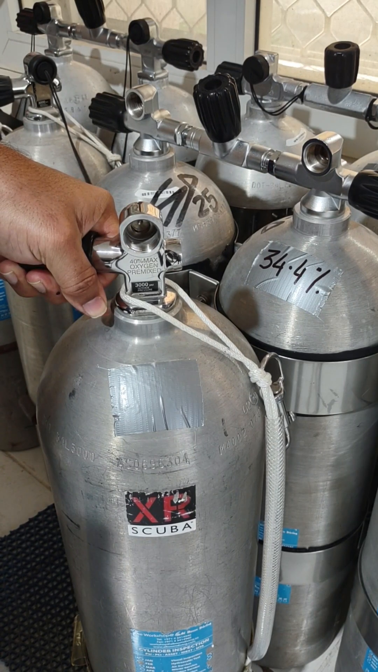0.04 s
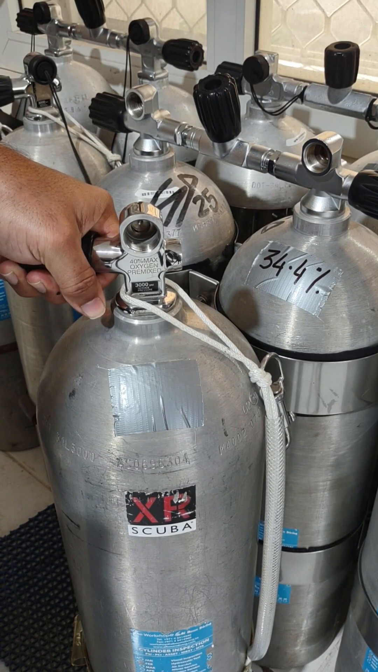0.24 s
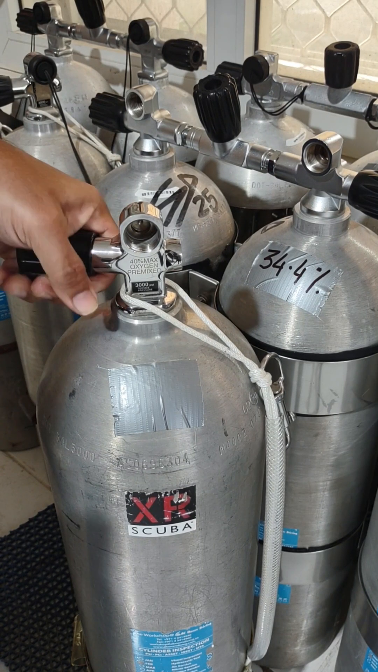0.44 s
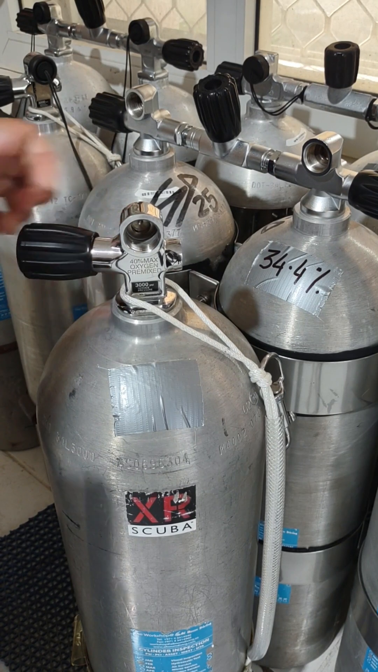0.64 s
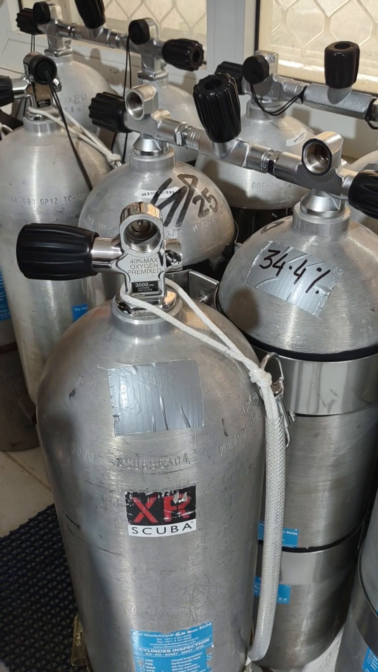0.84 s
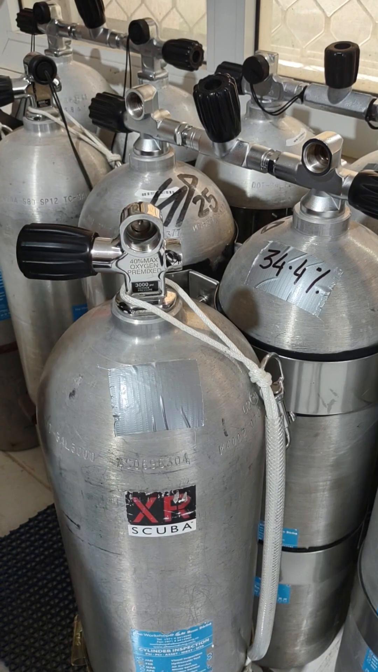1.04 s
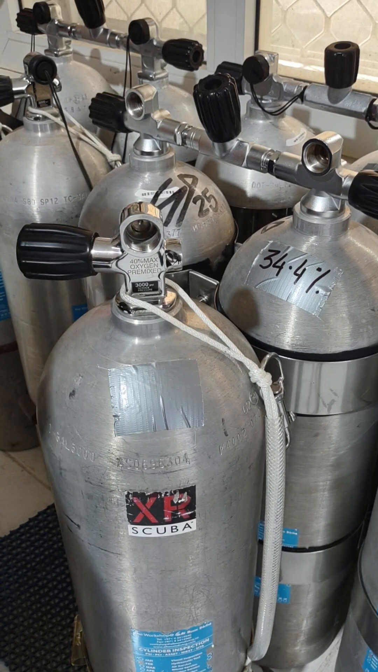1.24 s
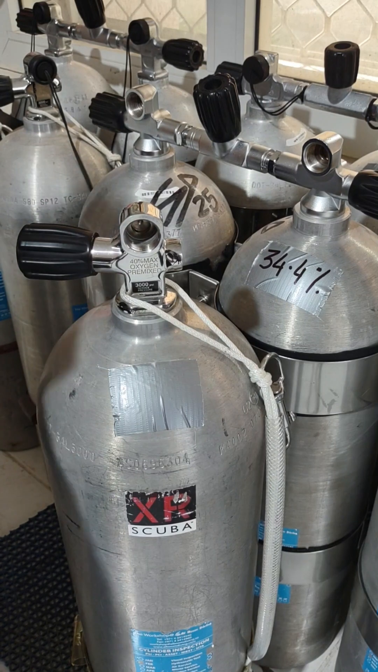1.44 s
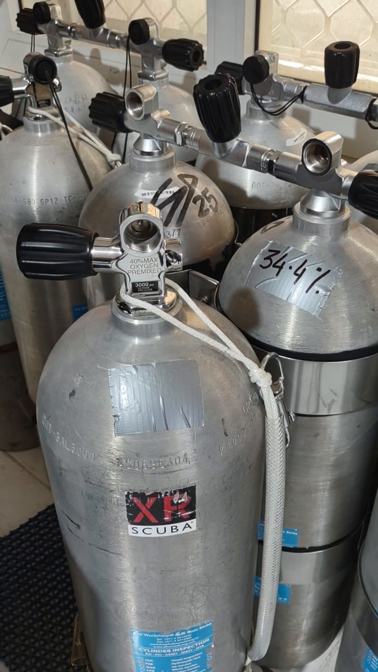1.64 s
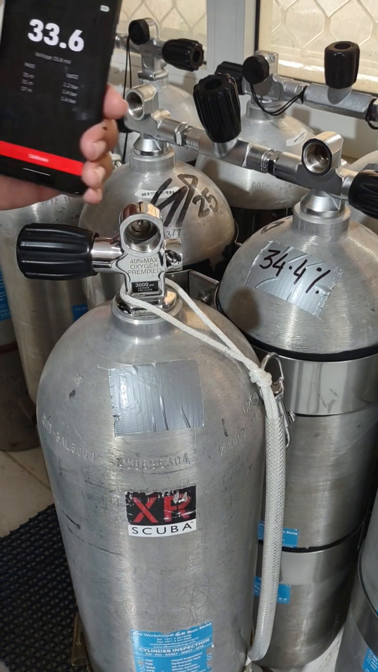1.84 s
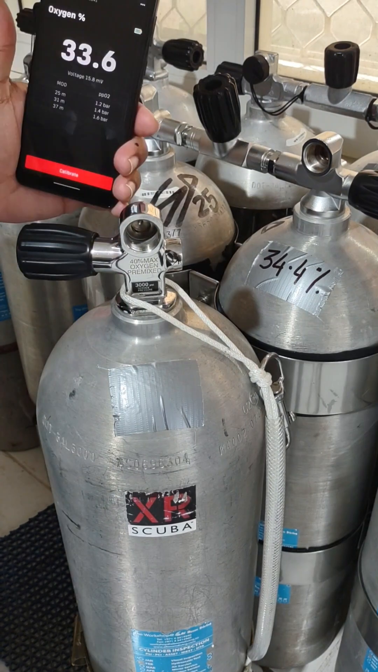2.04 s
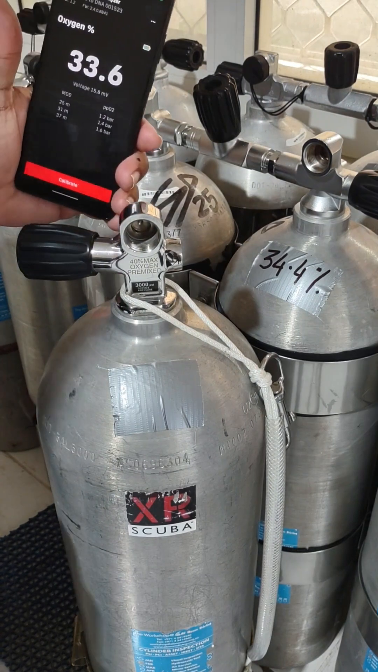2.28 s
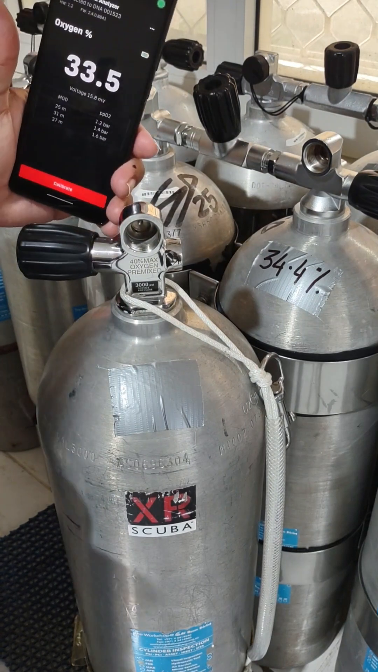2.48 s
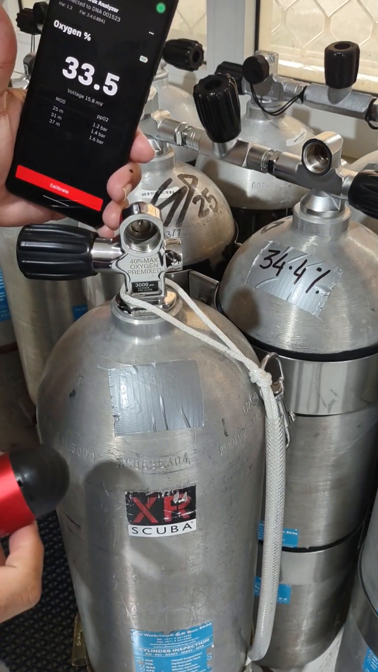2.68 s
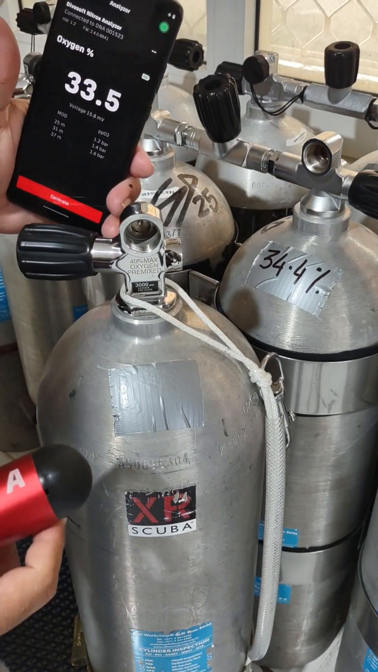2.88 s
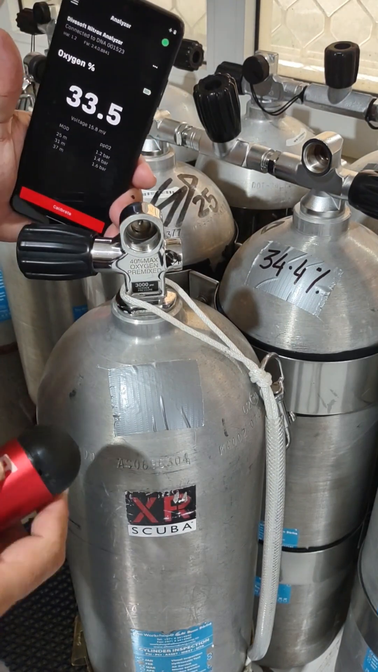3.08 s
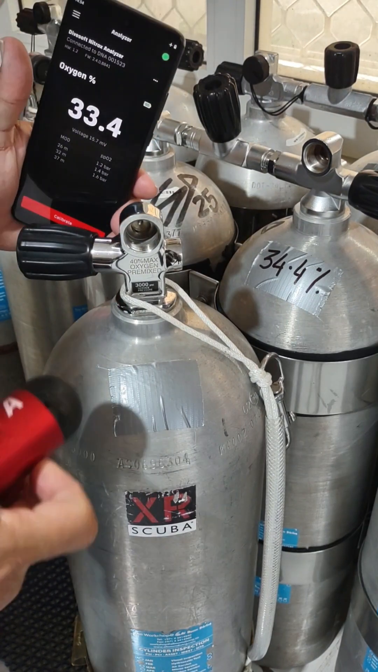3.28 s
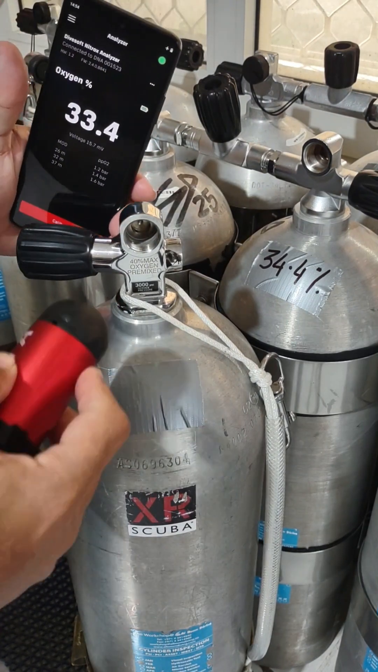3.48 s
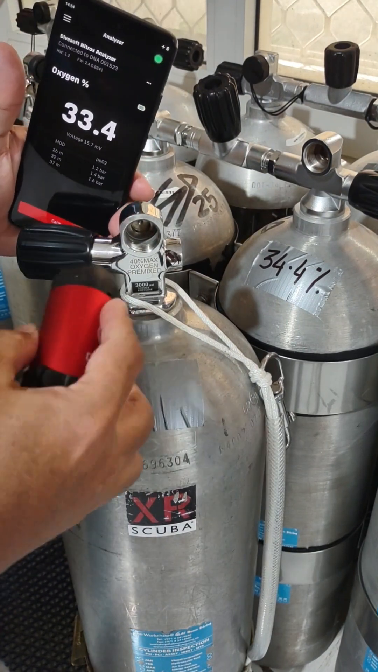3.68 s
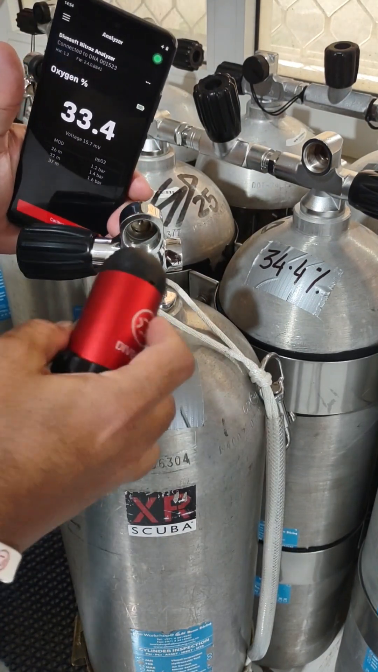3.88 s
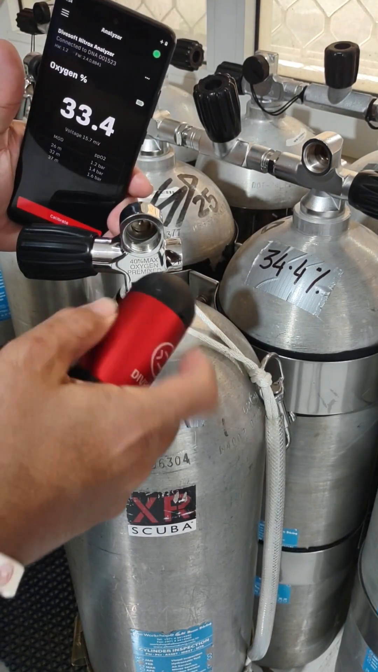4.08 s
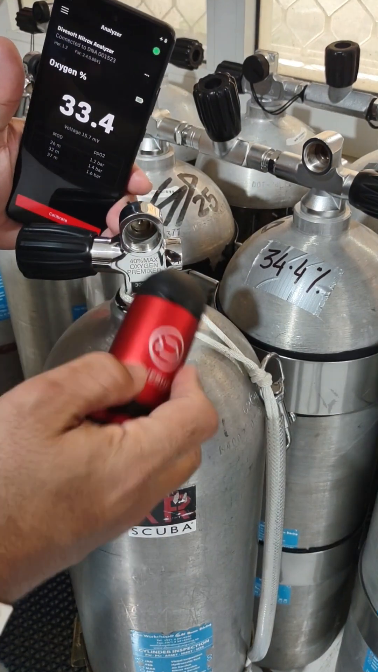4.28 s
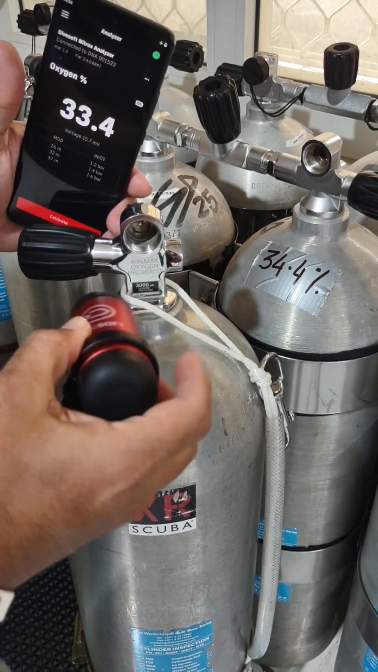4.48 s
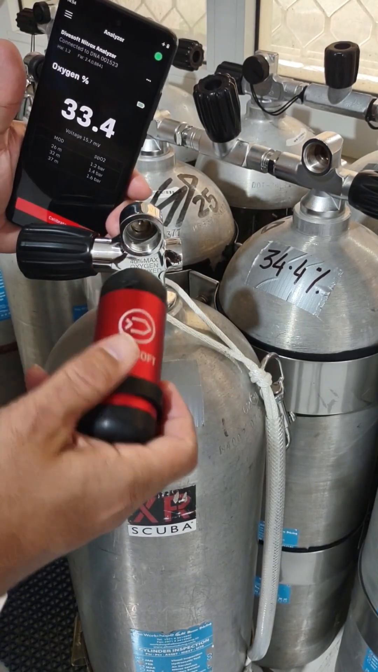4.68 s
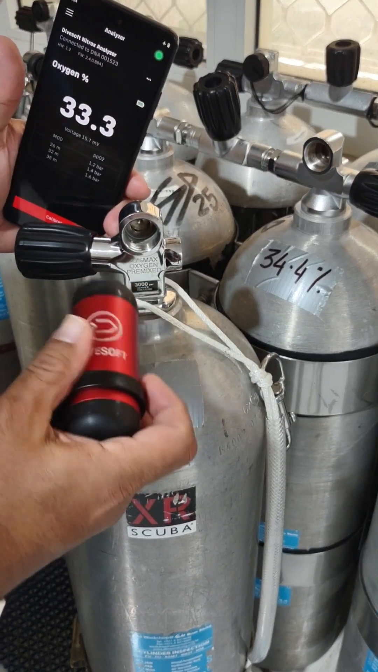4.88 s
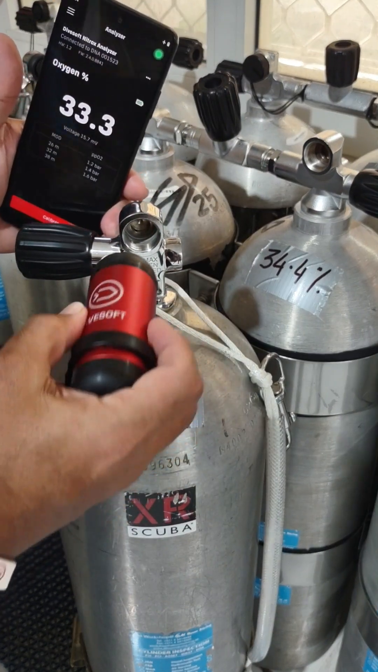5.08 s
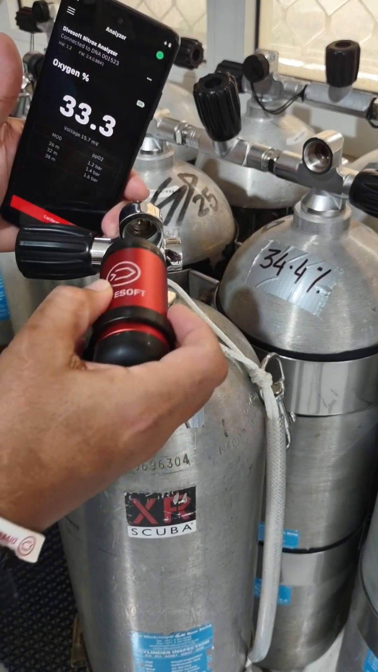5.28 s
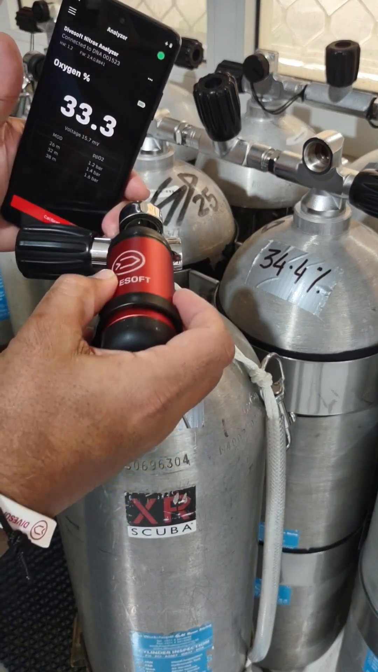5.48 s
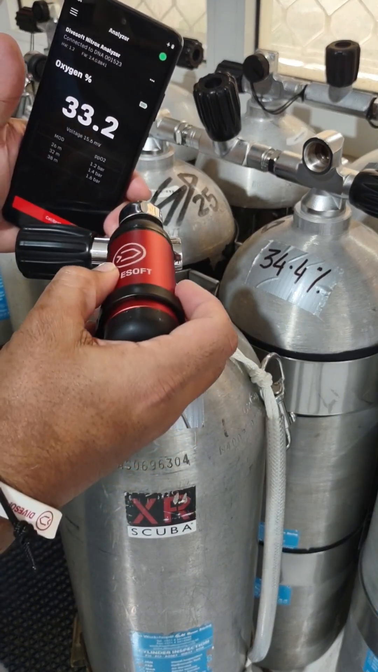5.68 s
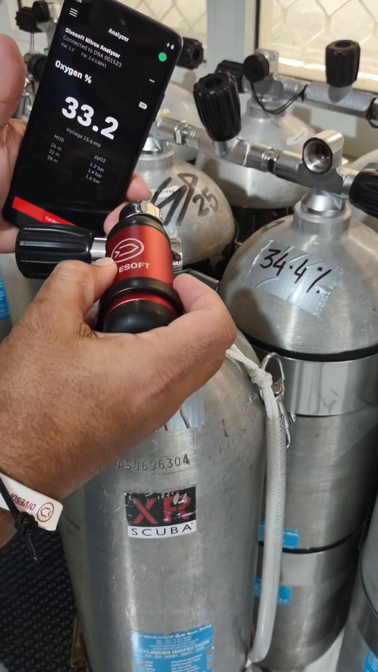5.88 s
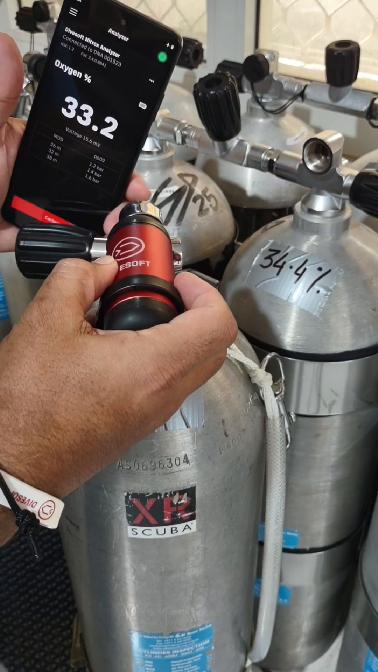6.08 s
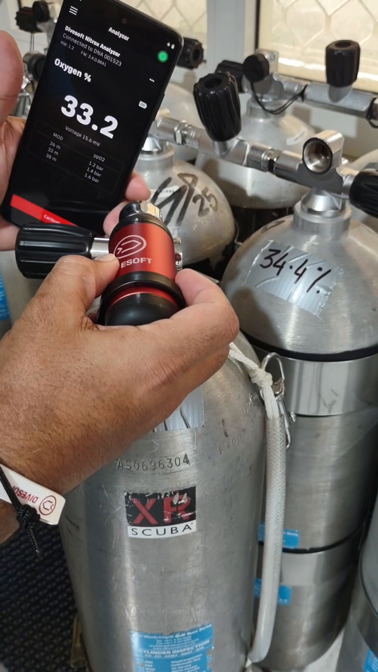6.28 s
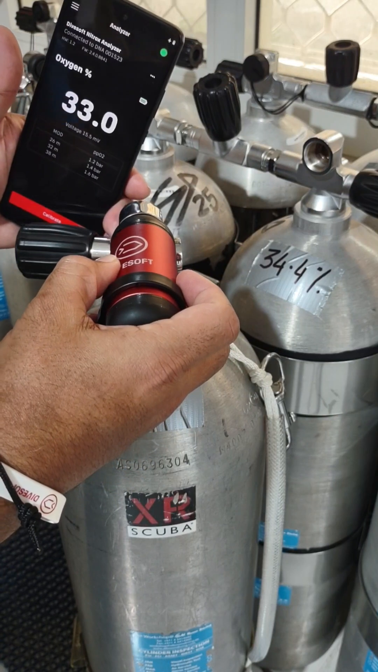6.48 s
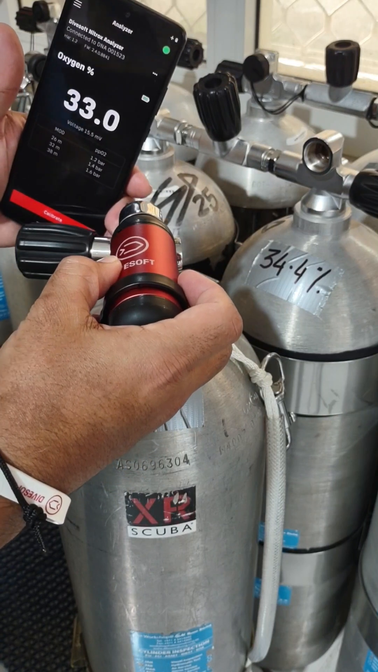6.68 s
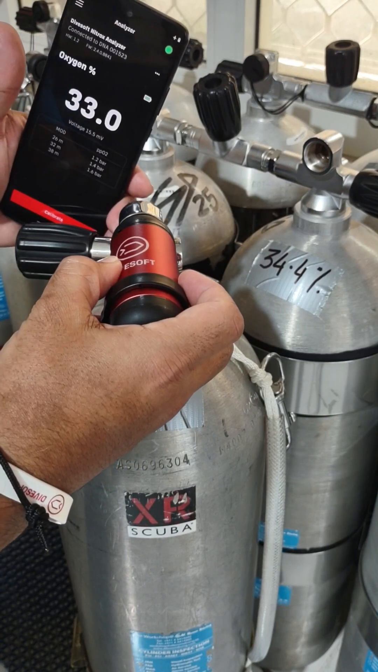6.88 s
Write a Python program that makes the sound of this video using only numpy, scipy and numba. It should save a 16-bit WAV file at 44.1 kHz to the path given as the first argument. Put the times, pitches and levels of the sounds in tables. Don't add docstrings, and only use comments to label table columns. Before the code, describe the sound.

From 0 s a strong, steady jet of gas hisses from a cylinder valve close to a stereo microphone, already running. It is bright and turbulent, with a resonant band near 3 to 4 kHz, higher layers and a noisy whistle around 10 kHz. It opens up slightly by 0.35 s, and hands passing shade it gently, most noticeably at about 4.3 s. From 5.2 s a sensor approaches the outlet: the hiss loses brightness and a breathy hollow tone emerges, falling from about 3.7 kHz to under 2 kHz by 6.5 s, weakening rapidly until sealed near 6.6 s. A small scrape and dull bump follow at 6.7 s, then faint sliding and quiet room tone to 6.9 s. Earlier soft bumps near 0.7, 1.2, 3.9 and 4.2 s, distant shuffling and a low motor drone lie mostly buried. Short echoes from neighbouring cylinders surround the jet.

```python
import sys
import numpy as np
from scipy import signal
from scipy.fft import rfft, irfft, next_fast_len
from scipy.io import wavfile
from numba import njit

SR = 44100
rng = np.random.default_rng(int(sys.argv[2]) if len(sys.argv) > 2 else 0)


def generate_wav(sig):
    pcm = np.round(np.clip(np.atleast_2d(sig).T, -1, 1) * 32767).astype(np.int16)
    wavfile.write(sys.argv[1], SR, pcm)


def level_to_linear(level):
    exponent = np.asarray(level, float) / 20
    return 10 ** exponent


N = 305610
TIME = np.arange(N) / SR
SIZE = next_fast_len(N + SR)
FREQ = np.maximum(np.arange(SIZE // 2 + 1) * SR / SIZE, 1)


def rms_one(x):
    return x / np.sqrt(np.mean(x ** 2) + 1e-20)


def in_time(rows):
    s, *columns = np.transpose(rows)
    return [np.interp(TIME, s, c) for c in columns]


def at_hz(points):
    hz, value = np.transpose(points)
    return np.interp(np.log(FREQ), np.log(hz), value)


def through(x, response):
    return irfft(rfft(x, SIZE) * response, SIZE)[..., :N]


def coloured(points, channels=1):
    inside = (FREQ >= points[0][0]) & (FREQ <= points[-1][0])
    phases = np.exp(2j * np.pi * rng.random((channels, len(FREQ))))
    return rms_one(irfft(phases * level_to_linear(at_hz(points)) * inside, SIZE)[:, :N])


def drift(rate):
    r = np.exp(-80 * np.pi * rate / SR)
    slow = signal.lfilter([1], [1, -2 * r, r * r], rng.standard_normal(N // 40 + 4002))[4000:]
    return np.interp(np.arange(N) / 40, np.arange(len(slow)), rms_one(slow - slow.mean()))


def bouts(rows, attack_s, release_s, sag_db_per_s):
    total = np.zeros(N)
    for s, length, db in rows:
        rise = np.clip((TIME - s) / attack_s, 0, 1)
        let_go = np.clip((s + length - TIME) / release_s, 0, 1)
        total += level_to_linear(db - sag_db_per_s * (TIME - s)) * rise * let_go
    return total


@njit
def glide(x, hz, width):
    out, r = np.zeros(len(x)), np.exp(-np.pi * width)
    for i in range(2, len(x)):
        out[i] = x[i] + 2 * r * np.cos(2 * np.pi * hz[i]) * out[i - 1] - r * r * out[i - 2]
    return out


def flutter(depth_db, together):
    return level_to_linear(depth_db * (0.21 * together + drift(33)))


def jet():
    together = drift(24)
    shade_db = shade()
    hollow_hz, gap_db, sunk = cover()
    out = near_bands(shade_db, gap_db, sunk, together)
    out += second_band(shade_db, sunk, together)
    out += whistle_bands(shade_db, gap_db, sunk, together)
    out += top_band(shade_db, gap_db, sunk, together)
    out += hollow_and_leak(hollow_hz, gap_db, sunk, together)
    seal_s, seal_db = 6.575, -7
    sealed = np.clip((TIME - seal_s) / 0.011, 0, 1)
    return out[0] * level_to_linear(seal_db * sealed)


# time in seconds, change of the hiss in dB.
SHADE = [(0, -3), (.35, -0.5), (1.29, -0.5), (1.42, -1.5), (1.7, -0.5), (2.68, -1), (3.3, -2), (3.8, -2),
         (3.98, -2.5), (4.15, -2.5), (4.3, -4), (4.42, -4), (4.53, -1.5), (4.73, -1.5), (4.82, -1.5),
         (5.04, -1.5), (5.2, -3), (6.93, -2)]


def shade():
    return in_time(SHADE)[0]


# time in seconds, pitch of the hollow in Hz, flow through the gap in dB.
COVER = [
    (5.2, 3750, 2.5),
    (5.46, 3406, 0),
    (5.85, 3175, -2.5),
    (6.02, 2600, -5),
    (6.3, 2460, -7),
    (6.45, 2260, -10),
    (6.54, 1840, -19),
    (6.6, 1700, -41),
    (6.93, 1810, -46),
]


def cover():
    open_hz = 3750
    hollow_hz, gap_db = in_time(COVER)
    return hollow_hz, gap_db, np.clip(np.log2(open_hz / hollow_hz), 0, 2)


# frequency in Hz, level in dB per Hz.
CUP = [(2150, -35), (2400, -19.5), (2750, -10), (2950, -11), (3250, -3), (3580, -2.5), (3720, 1.5),
       (3900, -2.5), (4350, -3.5), (4850, -12), (5100, -19), (5350, -28), (5700, -41)]
# frequency in Hz, level in dB per Hz.
BODY = [(400, -22.5), (700, -15), (850, -14), (1350, -2), (1520, -8), (1650, -1), (1750, 1), (1900, 6.5),
        (2100, 3.5), (2250, -3), (2500, -32)]
# start in seconds, length in seconds, strength in dB.
HANDS = [
    (.25, 0.44, -7),
    (.85, 0.83, -4.5),
    (1.6, 0.17, -9),
    (3.1, .75, -3.5),
    (4.2, 0.26, -10),
]


def near_bands(shade_db, gap_db, sunk, together):
    free_db = gap_db - 35.5 * sunk
    steady_db = -33 + 1.57 * shade_db
    thrown = (0.81 + bouts(HANDS, 0.1, 0.079, 0.1)) * level_to_linear(1.1 * drift(0.64))
    cup = coloured(CUP)
    flank_hz = 2900
    flank = through(cup, 1 / (1 + (FREQ / flank_hz) ** 12))
    cup = cup + (thrown - 1) * flank
    out = level_to_linear(steady_db + free_db) * cup * flutter(0.47, together)
    body_db = steady_db + 0.063 * free_db + 0.12 * gap_db - 25.0
    return out + level_to_linear(body_db) * thrown * coloured(BODY) * flutter(0.38, together)


# frequency in Hz, level in dB per Hz.
SECOND = [(5200, -65), (5500, -20), (6100, -13.5), (6500, -3), (7000, -1), (7650, 1.8), (8000, -6),
          (8100, -20)]


def second_band(shade_db, sunk, together):
    choke_octaves, choke_db = 0.36, 13
    choked = 1 / (1 + np.exp((choke_octaves - sunk) / 0.076))
    level_db = -32 + 1.26 * shade_db - 26 * sunk ** 1.5 - choke_db * choked
    return level_to_linear(level_db) * coloured(SECOND) * flutter(0.73, together)


# frequency in Hz, level in dB per Hz.
WHISTLE = [(8900, -27), (9150, -13), (9500, -4.5), (9800, 4.5), (10200, 4.5), (10550, -3.5), (10900, -12.5),
           (11150, -34)]
# frequency in Hz, level in dB per Hz.
SHOULDER = [(7950, -1), (8100, -7.5), (8500, -9), (9000, -7.5), (9300, -33)]
# frequency in Hz, level in dB per Hz.
SHELF = [(10750, -22), (11200, -1), (12100, 0), (12700, -4.5), (13100, -4), (13450, -8), (13800, -20)]


def whistle_bands(shade_db, gap_db, sunk, together):
    whistle_db = -31 + 0.81 * shade_db + gap_db
    rim_s, rim_half_s, rim_dip_db = 5.68, 0.2, -6
    rim_db = rim_dip_db * np.exp(-((TIME - rim_s) / rim_half_s) ** 2)
    shoulder_db = whistle_db + rim_db - 7.8 * sunk - 11.5
    shelf_db = whistle_db - 30 * np.minimum(sunk, .76) ** 4.1 - 13.5
    out = level_to_linear(whistle_db) * coloured(WHISTLE) * flutter(0.74, together)
    out += level_to_linear(shoulder_db) * coloured(SHOULDER) * flutter(1.3, together)
    return out + level_to_linear(shelf_db) * coloured(SHELF) * flutter(0.87, together)


# frequency in Hz, level in dB per Hz.
TOP = [(13300, -26), (13700, -10), (14200, 0), (14700, -1), (15200, -5), (15700, -8), (16000, -30)]


def top_band(shade_db, gap_db, sunk, together):
    edge_hz = 14200
    top = coloured(TOP)
    lower = through(top, 1 / (1 + (FREQ / edge_hz) ** 60))
    top = top + (level_to_linear(0.49 * (gap_db - 35.5 * sunk)) - 1) * lower
    level_db = -41 + 0.45 * shade_db + 0.97 * gap_db + 12.5 * sunk
    return level_to_linear(level_db) * top * flutter(1.0, together)


def hollow_and_leak(hollow_hz, gap_db, sunk, together):
    width_hz, forms_octaves = 500, 0.19
    hollow_db = -35.5 + 0.45 * gap_db - 6.5 * sunk
    hollow_db -= 16 * np.clip(1 - sunk / forms_octaves, 0, 1)
    hollow_db += 3.5 * np.exp(-((sunk - 0.33) / 0.067) ** 2)
    hollow_hz = hollow_hz * (1 + 0.012 * drift(4.8))
    breathy = coloured([(500, -49), (900, -4.5), (1500, -0.5), (3000, 0.0), (7000, -4.5)])[0]
    hollow = breathy * np.sin(2 * np.pi * hollow_hz / SR) ** 2
    for _ in range(2):
        hollow = glide(hollow, hollow_hz / SR, width_hz / SR)
    leak = level_to_linear(-59.5 + gap_db) * breathy
    return leak + level_to_linear(hollow_db) * rms_one(hollow) * flutter(0.74, together)


# delay in seconds, left level in dB, right level in dB.
ECHOES = [
    (.0013, -27, -32),
    (.0029, -21.5, -41),
    (.0047, -46, -29),
    (.0074, -62, -6.5),
]
# frequency in Hz, time to fall by 60 dB in seconds.
TAIL_T60 = [(500, 1), (2000, 0.61), (5000, 0.12), (15000, 0.097)]


def store_room(x):
    room_db, sway_radians = -9, 2.65
    t = np.arange(SR // 2) / SR
    tails = np.zeros((4, len(t)))
    for (low, t60), (high, _) in zip(TAIL_T60, TAIL_T60[1:] + [(20000, 0)]):
        band = signal.butter(1, [low, high], "band", fs=SR, output="sos")
        noise = signal.sosfilt(band, rng.standard_normal(tails.shape))
        tails += noise * level_to_linear(-60 * t / t60) / np.sqrt(t60)
    tails *= (t > .002) * level_to_linear(room_db) / np.sqrt(np.sum(tails ** 2, axis=1, keepdims=True))
    early = np.ones((2, len(FREQ)), complex)
    for delay, left_db, right_db in ECHOES:
        early += level_to_linear(np.array([[left_db], [right_db]])) * np.exp(-2j * np.pi * FREQ * delay)
    diffuse = through(x, rfft(tails, SIZE))
    sway = sway_radians * drift(0.62)
    return through(x, early) + np.cos(sway) * diffuse[:2] + np.sin(sway) * diffuse[2:]


# frequency in Hz, left minus right in dB.
PORT_BALANCE = [(2300, 3), (3500, 5), (3900, 10), (4800, 10), (5300, 0), (7000, 8), (7700, 14), (9100, -1),
                (9900, 14), (10900, -5), (11400, 1), (13450, -3), (14200, 8), (15000, -1)]
# frequency in Hz, lead in radians.
PORT_LEAD = [(500, 0), (2240, 1.75), (3270, 3.1), (4300, 4.25), (5340, 6.3), (6030, 6.65), (7060, 10.4),
             (8790, 15.6), (9820, 21.7), (10500, 24.4), (11200, 22.8), (12600, 25.15), (13600, 25.2),
             (14700, 28)]


def ports(x):
    shading_db = at_hz(PORT_BALANCE) * np.clip(FREQ / 1100 - 1, 0, 1)
    lead = np.interp(FREQ, *np.transpose(PORT_LEAD))
    right = through(x[1], level_to_linear(-shading_db) * np.exp(1j * lead))
    return np.array([x[0], right * level_to_linear(-2.5 - 0.47 * shade())])


def spread(points, alike):
    mid, side = coloured(points, channels=2)
    return mid + np.sqrt((1 - alike) / (1 + alike)) * side * np.array([[1], [-1]])


def scuff():
    start_s, landing_db, slide_db, slide_rise_s = 6.715, -57, -70, 0.17
    since = np.clip(TIME - start_s, 0, None)
    landing = level_to_linear(landing_db) * (since > 0) * np.exp(-since / 0.0085)
    sliding = level_to_linear(slide_db) * np.clip(since / slide_rise_s, 0, 1)
    return (landing + sliding) * spread([(680, 2), (820, 6.0), (980, 7), (1150, -9)], alike=.6)


# time in seconds, peak level in dB.
THUDS = [
    (0.72, -70),
    (1.179, -56),
    (3.928, -60),
    (4.229, -56.5),
    (6.719, -56),
]
# frequency in Hz, level in dB, time to fall by 60 dB in seconds.
THUD_MODES = [(212, -7.5, 0.11), (276, -14.5, 0.55), (283, -10, 0.68), (338, -9, 0.2), (974, -2.5, 0.05)]


def thuds():
    out = np.zeros(N + SR)
    strengths = rng.normal(0, 0.46, (len(THUDS), len(THUD_MODES)))
    t = np.arange(SR // 2) / SR
    for (s, peak_db), own_db in zip(THUDS, strengths):
        for (hz, level_db, t60), extra_db in zip(THUD_MODES, own_db):
            ring = level_to_linear(peak_db + level_db + extra_db - 60 * t / t60) * np.sin(2 * np.pi * hz * t)
            out[round(s * SR):][:len(t)] += ring * np.tanh(t / 0.0026)
    return out[:N]


# start in seconds, length in seconds, level in dB.
SHUFFLES = [
    (.72, 0.46, -69),
    (1.17, 0.69, -68),
    (1.9, 0.55, -83.5),
    (3.1, .3, -81),
    (3.62, 0.22, -79),
    (3.92, 0.28, -73.5),
    (4.2, .35, -77),
    (5.55, 0.605, -76),
    (6.7, 0.36, -75),
]
# frequency in Hz, level in dB per Hz.
SHUFFLE_COLOUR = [(100, -12), (200, -4), (280, 0.6), (400, -5), (600, -4), (900, -2)]


def shuffling():
    moving = level_to_linear(-84) + bouts(SHUFFLES, 0.035, 0.079, 18)
    return moving * level_to_linear(0.65 * drift(9.0)) * spread(SHUFFLE_COLOUR, alike=0.6)


# start in seconds, length in seconds, level in dB.
SWELLS = [
    (.5, .9, -84.5),
    (2.1, 0.28, -82.5),
    (3.3, .7, -90),
    (4.75, 1.93, -82.5),
]


def drone():
    level = level_to_linear(-86) + bouts(SWELLS, 0.19, 0.23, 0.5)
    return level * spread([(55, -17), (80, -9.0), (100, -13), (120, -21)], alike=1.0)


# frequency in Hz, level in dB per Hz.
FLOOR = [(15, -39), (25, -1.5), (70, 0.5), (171, 0), (205, -3), (236, -2), (339, -4.5), (461, -8.5),
         (700, -12), (910, -37), (1540, -120)]
# frequency in Hz, level in dB per Hz.
AIR = [(600, -21), (850, -10), (1150, -12.5), (1500, -5.5), (2300, -5), (2800, 1), (4000, -6.5),
       (5000, -9.5), (6400, -14), (10000, -9), (11000, -15), (14200, -19), (15000, -7), (15800, -2)]


def room_tone():
    rumble = level_to_linear(-78.5) * spread(FLOOR, alike=0.37)
    return rumble + level_to_linear(-67) * spread(AIR, alike=0.16) * level_to_linear(np.array([[0], [-3.5]]))


def scene():
    background = scuff() + thuds() + shuffling() + drone() + room_tone()
    return ports(store_room(jet())) + background


def roll_off(x):
    return signal.sosfilt(signal.butter(12, 15950, fs=SR, output="sos"), x)


def record(dry):
    return roll_off(dry)


dry = scene()
out = record(dry)
generate_wav(out)
```